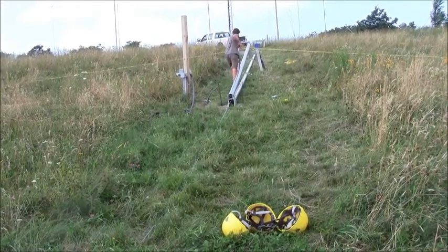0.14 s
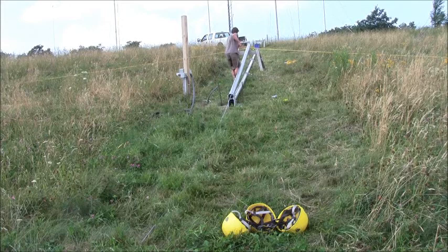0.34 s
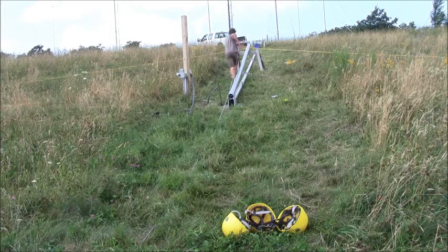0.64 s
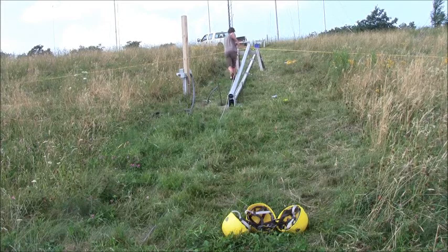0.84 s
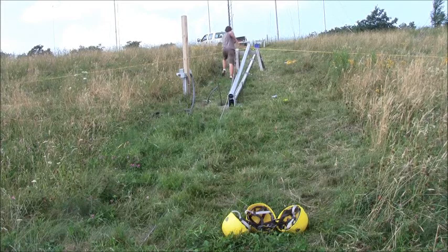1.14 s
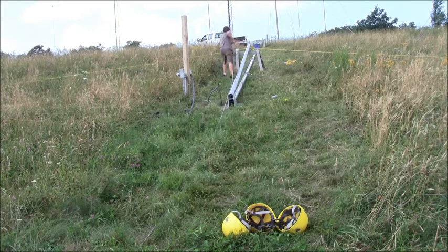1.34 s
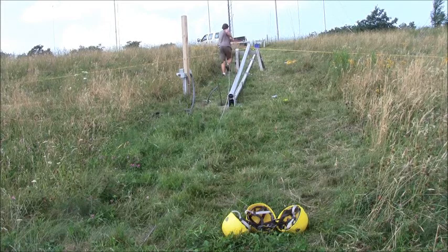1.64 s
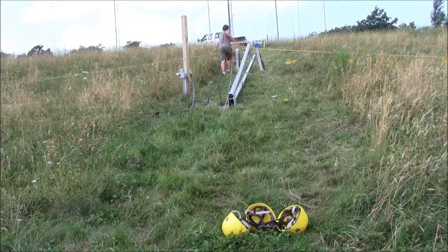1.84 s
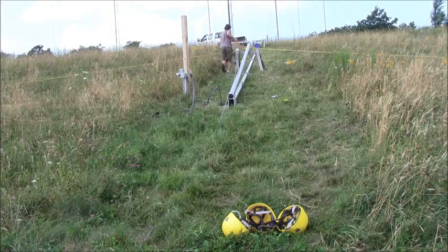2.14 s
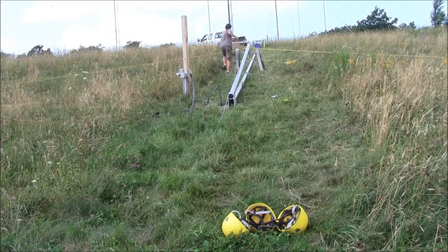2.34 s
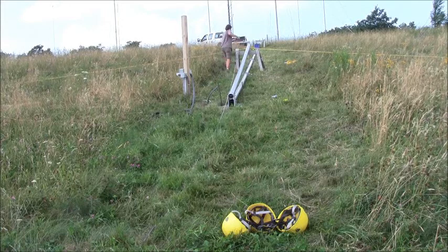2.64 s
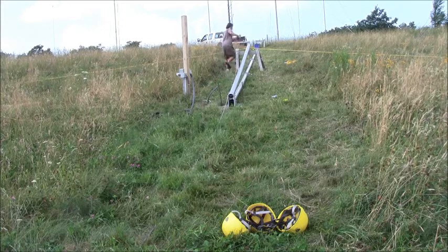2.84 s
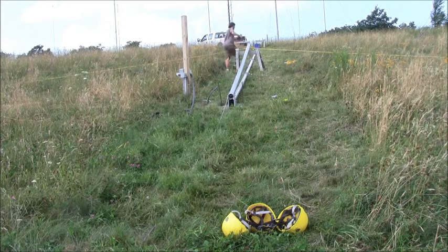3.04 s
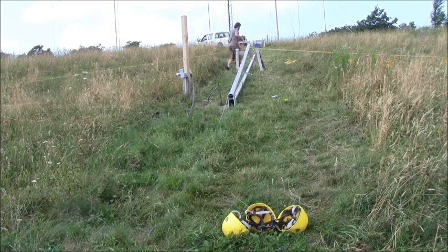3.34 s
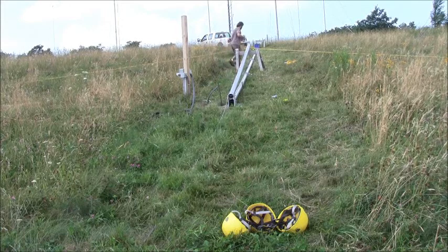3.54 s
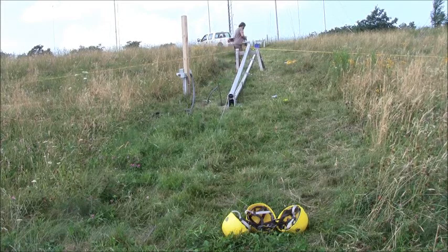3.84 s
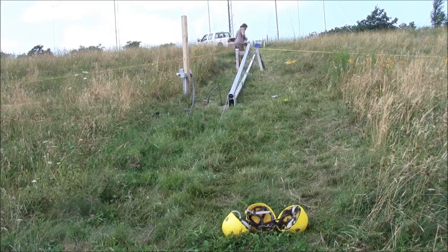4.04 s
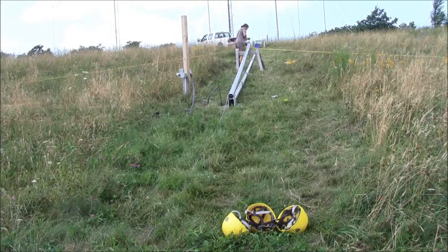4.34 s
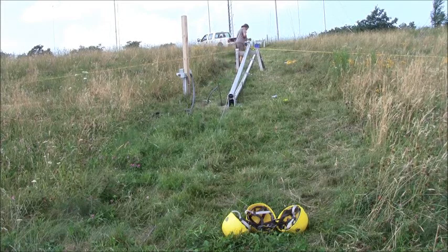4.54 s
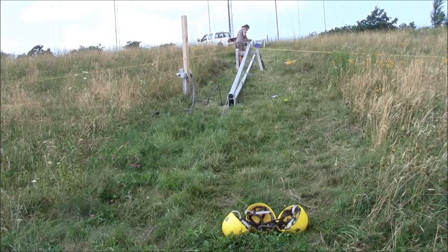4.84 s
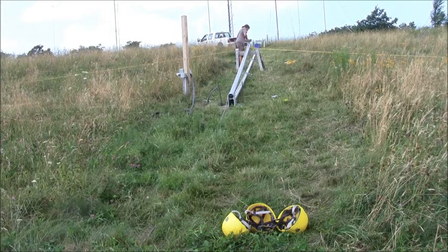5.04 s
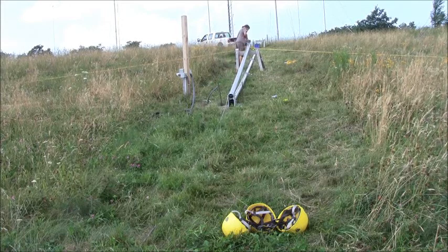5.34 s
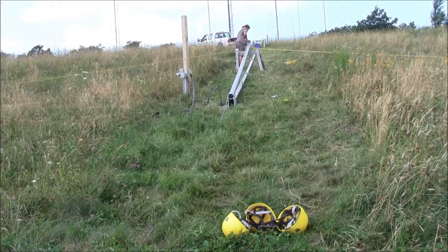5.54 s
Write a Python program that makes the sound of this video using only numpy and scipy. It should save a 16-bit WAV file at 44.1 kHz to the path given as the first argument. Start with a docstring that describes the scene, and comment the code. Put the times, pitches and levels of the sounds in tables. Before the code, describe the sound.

In a quiet meadow, a loose spinning winch drum clatters and hums steadily, stops, and a few steel clicks and scrapes follow.

```python
"""A winch drum runs freely straight ahead of the microphone while its cable is pulled off: random knocks
sound its frame and barrel modes, and rubbing makes flanges, barrel and frame hum and sing.
The pull ends after about three seconds; catches click and rub, loose fittings ping, and a steel part
slides home and rings in decaying modes. The place is a summer meadow: near grasshoppers rasp in pulsed
tones; distant ones, low wind and a few puffs at the microphone are coloured noise."""
import sys
import numpy as np
from scipy import signal
from scipy.fft import rfft, irfft, next_fast_len
from scipy.io import wavfile
from scipy.ndimage import map_coordinates

SR = 44100
rng = np.random.default_rng(int(sys.argv[2]) if len(sys.argv) > 2 else 0)


def pcm_store(signal):
    """Save signal as 16-bit PCM."""
    levels = np.round(np.clip(np.atleast_2d(signal), -1, 1) * 32767)
    wavfile.write(sys.argv[1], SR, levels.astype(np.int16).T)


N = 250929
T = np.arange(N) / SR  # time/s

# Levels in the tables are relative: filters and mixing gains follow.
# resonances of the winch frame: [f/Hz, width/Hz, level/dB]
FRAME_MODES = [(238, 6, -7), (383.7, 33, -1), (449, 67, -4.5), (534.4, 69, 0.5), (592.7, 57.7, 1)]
# resonances of the drum barrel: [f/Hz, width/Hz, level/dB]
BARREL_MODES = [(753.5, 45, -4), (876, 53, -2.5), (1031, 45.4, 4.5), (1124, 68, 1), (1229, 105, -7),
                (1365, 4.2, -0.5), (1477, 78, -9.5), (1769, 84, -7), (1917, 31, -6), (2023, 107, -8),
                (2175, 37, -3), (2266, 60, -8.5), (2503, 81, -10.5), (2675, 58, -9.5), (2846, 110, -12),
                (2972, 34, -17), (3100, 42, -12)]
# groups of barrel modes struck together: [low f/Hz, high f/Hz]
BARREL_ZONES = [(730, 1550), (1550, 2380), (2380, 3200)]
# how hard the pulled cable drives the drum, before the final fall: [t/s, level/dB]
PULL_DRIVE = [(0.0, -29.5), (0.06, -33), (0.76, -30.5), (0.86, -28.5), (1.08, -32), (1.12, -28.5),
              (1.15, -33), (3.32, -34), (3.44, -27), (3.72, -36.5), (3.98, -32.5), (4.06, -52)]
# the drum is nudged round a little: [t/s, level/dB, half length/s]
NUDGES = [(4.38, -49.5, 0.16), (4.96, -48, 0.15)]
# heavy rattles of the drum on its axle: [t/s, level/dB, length/s, tilt/(dB per octave) about 1400 Hz]
RATTLES = [(0.53, -23, 0.08, 2), (0.633, -19.5, 0.014, -2), (0.684, -20, 0.014, -6), (0.766, -24, 0.01, 11),
           (0.801, -19.5, 0.032, -8), (0.85, -21.5, 0.018, 8), (0.868, -13, 0.019, -1.5),
           (0.91, -19, 0.038, 0), (0.95, -22, 0.016, -7), (1.502, -20.5, 0.023, -3.5),
           (1.579, -18.5, 0.0086, -3), (1.634, -29, 0.021, -6), (2.058, -31, 0.013, -19),
           (2.125, -32, 0.012, -2), (2.5, -25, 0.019, 5), (2.658, -25.5, 0.045, -3), (2.754, -21, 0.027, 2),
           (2.96, -27.5, .05, -2.5), (3.433, -20.5, 0.033, 1.5), (3.62, -37, 0.0086, -17),
           (3.772, -42.5, 0.017, 21.5), (3.821, -50, 0.014, 21), (3.944, -47, 0.0083, 15),
           (4.045, -44, 0.0089, -7), (4.173, -47, 0.01, -11), (4.28, -41, 0.0072, -5),
           (4.4, -41.5, 0.012, -3), (5.236, -41.5, 0.07, -5), (5.662, -33.5, 0.01, 7.5)]
# colour of the drum's hiss: [f/Hz, level/dB]
HISS_COLOUR = [(1500, 0.5), (3000, 8.5), (4300, 4.5), (5300, 1), (6500, 4), (8000, 4), (10000, -5.5),
               (12000, -8), (15000, -21)]
# steady flange tones: [f/Hz, waver/Hz, level/dB]
FLANGE_TONES = [(4437, 20, -6.5), (5646, 18, -12.5)]
# the strongest flange tone comes and goes: [t/s, level/dB]
WHINE_LEVEL = [(0.0, -50), (0.04, -45.5), (0.23, -63), (0.27, -49), (0.31, -60), (0.4, -46.5), (0.59, -52),
               (0.62, -46), (0.71, -56), (0.92, -48), (0.97, -50.5), (1.11, -47), (1.29, -60),
               (1.34, -54.5), (2.29, -58), (2.37, -48), (2.49, -58), (2.54, -47.5), (2.68, -60),
               (2.74, -42), (2.77, -50), (3.11, -51), (3.25, -68), (3.4, -61), (3.43, -44), (3.63, -66),
               (3.81, -49), (3.9, -77)]
# other barrel modes that sing along: [f/Hz, width/Hz, level/dB]
BARREL_OVERTONES = [(1050, 130, -10.5), (1750, 50, -6), (2140, 19, -5)]
# the rubbing catches and the barrel sings out: [t/s, level/dB, half length/s]
SQUEALS = [(.12, -34, 0.053), (.34, -35, 0.045), (.6, -32.5, 0.12), (1.84, -40, 0.054), (2.4, -39, 0.11),
           (2.67, -34.5, 0.091), (2.95, -32, 0.044), (3.235, -32, 0.018), (3.27, -36, 0.21)]
# colour of the meadow's steady noise, with distant grasshoppers near 8.4 kHz: [f/Hz, level/dB]
MEADOW_COLOUR = [(88, -14), (150, 0.5), (257, -1.5), (393, 3), (991, -4), (1320, -3.5), (1600, -6.5),
                 (6430, -20.5), (8410, -4), (10000, -28.5), (15000, -29.5)]
# colour of the low wind: [f/Hz, level/dB]
BREEZE_COLOUR = [(15, -28), (28, -17), (48, -4.5), (70, -3.5), (110, -1.5), (170, -5.5), (250, -6),
                 (330, -66), (500, -70)]
# colour of a puff on the microphone: [f/Hz, level/dB]
PUFF_COLOUR = [(15, -16), (28, -16), (48, 2), (75, 2), (105, -7), (170, -7), (240, -29), (330, -38),
               (500, -70)]
# puffs of wind on the microphone: [t/s, level/dB, half length/s]
PUFFS = [(1.43, -48, 0.029), (3.225, -38.5, 0.054), (3.38, -50.5, 0.17), (3.7, -50, 0.025),
         (4.13, -58, 0.053), (5.58, -57, 0.05)]
# grasshoppers: [f/Hz, pitch scatter/Hz, fall in a stroke/Hz, stroke rate/(1/s), t of one stroke/s,
#                stroke swing either way/dB, level/dB]
GRASSHOPPERS = [(8830, 90, 600, 19.05, 4.677, 10, -2), (7800, 130, 1400, 18.3, 4.709, 10, -2.5),
                (8420, 180, 150, 18.3, 4.7, 2.5, .3)]
# hard knocks of the drum against its axle:
# [t/s, level in the frame/dB, level in low barrel modes/dB, level in high barrel modes/dB]
HARD_KNOCKS = [(0.343, -20.5, -27, -35), (0.407, -29, -32, -26), (0.764, -30, -32, -20),
               (0.773, -26, -30, -17), (0.845, -28, -18, -30), (0.862, -16.5, -23, -28),
               (0.873, -22, -28, -15), (0.883, -19, -21, -32), (0.944, -22.5, -19, -29),
               (0.948, -17.5, -24, -22), (0.962, -22, -19, -21), (0.994, -37, -33, -25),
               (1.052, -30, -31, -20), (1.097, -29, -20, -38), (1.161, -33, -23, -25.5),
               (1.456, -31, -22, -30), (1.95, -39, -32, -39), (2.579, -25, -27, -33),
               (1.627, -25, -22, -23), (1.633, -22, -21, -24), (1.979, -22, -24, -33),
               (2.186, -19, -29, -34), (3.082, -46, -29.5, -21.5), (3.088, -50, -36, -20),
               (3.093, -54, -45, -26), (3.435, -22.5, -32, -19), (3.764, -29.5, -36, -45),
               (3.818, -37, -42, -37), (3.935, -29.5, -47, -35.5), (3.968, -39, -57, -57),
               (4.828, -54, -40, -56)]
# loose fittings that ping once: [t/s, f/Hz, level/dB, t60/s]
PINGS = [(0.849, 5700, -36, .14), (3.233, 3750, -45, 0.04), (3.262, 4930, -41, .03),
         (3.282, 4710, -40, .035), (3.294, 4740, -37.5, 0.038), (3.321, 4900, -38, 0.026),
         (4.035, 6900, -48, 0.036), (4.27, 5940, -57, 0.043), (4.668, 1600, -44, 0.052)]
# steel contacts: [t/s, level/dB, brightness/dB]
CLICKS = [(3.082, -12, -39), (3.088, -18, -32), (3.093, -43, -29), (3.114, -39, -22), (3.145, -22, -16.5),
          (3.15, -42, -26), (3.235, -49, -19), (3.2844, -29, -19), (3.32, -23, -27), (3.424, -14, -49),
          (3.435, -18, -47), (3.442, -23, -40), (3.537, -29, -10.5), (3.547, -38, -26),
          (3.764, -38.5, -2.5), (3.78, -37, -7), (3.815, -41.5, -0.5), (3.932, -29.5, -9.5),
          (3.946, -46, -2), (4.27, -42, -23), (4.356, -37.5, -14), (4.483, -29, -16), (4.829, -42, -33),
          (4.9545, -29, -48), (5.028, -37, -34), (5.2195, -18, -18), (5.266, -21.5, -35), (5.446, -27, -42),
          (5.66, -21, -33)]
# short rubs of cable and steel: [t/s, length/s, level/dB, brightness/dB]
RUBS = [(1.766, 0.014, -44.5, 12), (3.267, 0.034, -59, -3), (3.407, 0.027, -39, -21),
        (3.712, 0.017, -42, 5), (3.807, 0.017, -54.5, 16), (4.421, 0.036, -43.5, -1),
        (4.476, 0.057, -35.5, 3), (5.2, 0.067, -37, 0.5), (5.424, 0.02, -43, -23), (5.629, 0.072, -44, -17)]
# colour of steel contacts: [f/Hz, level/dB]
STEEL_COLOUR = [(180, -39), (300, 12.5), (459, -28), (637, -0.5), (763, -6), (1250, -1), (1790, -3.5),
                (1970, -5.5), (3070, -7.5), (3670, -6), (6510, -14), (9180, -17.5), (10800, -23),
                (15000, -38)]
# resonances of the bracket that carries the catches: [f/Hz, width/Hz, level/dB]
BRACKET_MODES = [(1229.7, 15, 8), (1220.6, 11.6, 9), (1448, 23, 6.5), (1590, 5.2, -5), (1990, 11, 1)]
# modes of the sliding part: [f/Hz, level/dB, free t60/s]
SLIDER_MODES = [(1222, -5, 2), (1275, -6, 1.6), (1345, -9, 1.6), (1585, -16, 0.7), (2290, -13.5, 1.4),
                (3632, 2, 0.9), (3700, -3, 1.0)]
# blows on the sliding part: [t/s, level/dB, tilt/(dB per octave) above its first mode, share of free t60]
SLIDER_BLOWS = [(4.488, -57, 5, .5), (4.535, -43, -1, .75), (4.705, -54, .5, .75), (4.945, -55, -13, 1),
                (5.22, -53, -10, .2), (5.266, -45, -13, .2), (5.447, -50, -14, .12), (5.659, -51, -10, .12)]

STOP_S, STOP_DB_PER_S = 3.134, 14.5  # the pull ends and the drum comes to rest
CRUISE_DB = -32.5  # drive of a steady pull
IDLE_CLATTER_DB = -63  # floor: loose parts stir while the winch is handled
RATTLE_RISE = 0.95  # rise of a rattle as a share of its fading length
FLUTTER_DB, SWELL_DB = 2.8, 0.8  # fast and slow unsteadiness of the sung tones
WHINE_HZ, WHINE_WAVER_HZ = 6883, 12.3
BARREL_HZ, BARREL_HALF_WIDTH_HZ = 1337, 22  # half width at half amplitude
OVERTONE_DB = -8  # relative to the main barrel note
BARREL_GRIT_DB, BARREL_GRIT_RATE = 3.5, 260  # depth, and random knots a second
HUM_HZ, HUM_WAVER_HZ, HUM_DB = 236, 11.4, -61.5  # the frame's lowest mode
BREEZE_DB, BREEZE_SWING_DB, BREEZE_RATE = -57.5, 3.5, 7.3  # mean, swing, random knots a second
HOPPER_DB = -61.5  # shared by the chorus, before its balance and slow rise
PING_WAVER = 0.015  # loose contact blurs the pitch, as a share of it
CRACK_T60_S, TAIL_T60_S = 0.024, 0.096  # the two decays of a steel contact
RING_WAVER_HZ, RING_FLUTTER_DB = 11.2, 2.5  # the part sits loosely, so its ring wavers
TOP_HZ = 15200


def amp(db):
    """Decibels to gain."""
    return 10 ** (np.asarray(db) / 20)


def unit(x):
    """Scale to rms 1."""
    return x / np.sqrt(np.mean(x ** 2) + 1e-20)


def along(points, hz):
    """Read (f/Hz, value) points on a log frequency axis."""
    f, value = np.transpose(points)
    return np.interp(np.log(hz + 1), np.log(f + 1), value)


def over_time(rows):
    """Read (t/s, value) points at every sample."""
    return np.interp(T, *np.transpose(rows))


def wobble(rate):
    """A smooth random curve, rate knots a second."""
    knots = rng.standard_normal(int(N * rate / SR) + 4)
    return map_coordinates(knots, [T * rate])


def filtered(x, response):
    """Multiply the spectrum of x by a response of frequency."""
    m = next_fast_len(N + SR // 2)
    return irfft(rfft(x, m) * response(np.fft.rfftfreq(m, 1 / SR)), m)[..., :N]


def resonate(x, modes):
    """Pass x through parallel resonances of alternating sign."""
    def response(f):
        total = 0
        for k, (hz, width, db) in enumerate(modes):
            damping = 1j * f * width
            total = total + (-1) ** k * amp(db) * damping / (hz * hz - f * f + damping)
        return total
    return filtered(x, response)


def band(x, lo_hz, hi_hz, order=6):
    """Band-pass without phase shift."""
    def response(f):
        low_cut = 1 + (lo_hz / (f + 1)) ** (2 * order)
        high_cut = 1 + (f / hi_hz) ** (2 * order)
        return 1 / np.sqrt(low_cut * high_cut)
    return filtered(x, response)


def coloured(x, colour):
    """Give x the level over frequency of a colour table."""
    return filtered(x, lambda f: amp(along(colour, f)))


def noise(colour):
    """Coloured noise of rms 1."""
    return unit(coloured(rng.standard_normal(N), colour))


def spread(mid, side, side_db):
    """Left and right from a shared and an opposed part."""
    return mid + amp(side_db) * np.array([side, -side])


def knocks(rate, scatter_db):
    """Random small impacts of uneven size, on average rate a second, scaled to rms 1."""
    hits = rng.random(N) < rate / SR
    signs = rng.choice([-1, 1], N)
    return unit(hits * signs * amp(scatter_db * rng.standard_normal(N)))


def bell(age, length):
    """A smooth Gaussian swell with a tiny floor."""
    return np.exp(-np.minimum((age / length) ** 2, 20))


def swells(rows):
    """Gain of smooth (t/s, level/dB, half length/s) swells, added in power."""
    return np.sqrt(sum((amp(db) * bell(T - s, length)) ** 2 for s, db, length in rows))


def wavering_tone(hz, waver_hz, rate):
    """A sine whose pitch strays at random."""
    return np.sin(2 * np.pi * np.cumsum(hz + waver_hz * wobble(rate)[:len(hz)]) / SR)


def drive():
    """Level in dB of the drum's motion: the long pull, then the nudges."""
    pull = amp(over_time(PULL_DRIVE) - STOP_DB_PER_S * np.maximum(T - STOP_S, 0))
    return 20 * np.log10(np.hypot(pull, swells(NUDGES)))


def driven(steady_db, slope):
    """Level in dB of a sound that gains slope dB per dB of drive above a steady pull."""
    return steady_db + slope * (drive() - CRUISE_DB)


def rattle_force(hz):
    """Heavy rattles of the drum on its axle, as force near one frequency."""
    force = 0
    for s, db, length, tilt in RATTLES:
        age = T - s
        shape = bell(np.where(age < 0, age / RATTLE_RISE, age), length)
        force = force + amp(db + tilt * np.log2(hz / 1400)) * shape
    return force


def drum():
    """Dense random knocks of axle and cable make frame and barrel resound, under a hiss."""
    clatter_db = np.maximum(driven(-37.5, slope=1.36), IDLE_CLATTER_DB)
    shake = wobble(28.17)  # the loose drum shakes unevenly
    blows = knocks(rate=1700, scatter_db=2.0)

    def frame(x):
        return band(resonate(x, FRAME_MODES), 303, 706, order=8)

    rumble_force = np.hypot(amp(drive() + shake), 0.26 * rattle_force(1020))
    rumble = frame(blows * rumble_force) / np.std(frame(blows))
    barrel_gain = np.std(resonate(blows, BARREL_MODES))
    clatter = 0
    for lo, hi in BARREL_ZONES:  # the wandering contact favours now these modes, now those
        steady = amp(clatter_db + 0.11 * shake + 1.7 * wobble(40))
        force = np.hypot(steady, 0.33 * rattle_force(np.sqrt(lo * hi)))
        clatter += band(resonate(blows * force, BARREL_MODES), lo, hi, order=10) / barrel_gain
    hiss = unit(coloured(knocks(rate=4200, scatter_db=3.5), HISS_COLOUR))
    return rumble + clatter + hiss * amp(driven(-46, slope=0.86) + 1.8 * shake)


def sung_tone(hz, waver_hz):
    """A narrow tone of unsteady pitch and level, rms 1."""
    unsteady = amp(SWELL_DB * wobble(7.0) + FLUTTER_DB * wobble(75))
    return unit(unsteady * wavering_tone(np.full(N, hz), waver_hz, rate=160))


def singing():
    """Rubbing keeps flanges, barrel and frame in a narrow, fluttering ring until the drum slows."""
    flanges = sum(amp(db) * sung_tone(hz, waver) for hz, waver, db in FLANGE_TONES)
    flanges = flanges * amp(driven(-50.5, slope=0.85))
    flanges += sung_tone(WHINE_HZ, WHINE_WAVER_HZ) * amp(over_time(WHINE_LEVEL) + 0.5)
    flanges *= np.clip((4.0 - T) / 0.5, 0, 1)

    def barrel_peak(f):
        return 1 / (1 + ((f - BARREL_HZ) / BARREL_HALF_WIDTH_HZ) ** 2)

    rubbed = unit(filtered(rng.standard_normal(N), barrel_peak))
    overtones = unit(resonate(rng.standard_normal(N), BARREL_OVERTONES))
    grit = amp(BARREL_GRIT_DB * wobble(BARREL_GRIT_RATE))  # the contact sticks and slips
    barrel = unit(grit * (rubbed + amp(OVERTONE_DB) * overtones))
    barrel *= np.hypot(amp(driven(-46, slope=0.72)), swells(SQUEALS))
    hum = sung_tone(HUM_HZ, HUM_WAVER_HZ) * amp(HUM_DB) * np.clip((4.7 - T) / 0.44, 0, 1)
    return flanges + barrel + hum


def meadow():
    """The meadow's faint steady noise with distant grasshoppers, and low wind and puffs at the microphone."""
    steady = spread(noise(MEADOW_COLOUR), noise(MEADOW_COLOUR), side_db=-1.5) * amp(-53)
    strength = amp(BREEZE_DB + BREEZE_SWING_DB * wobble(BREEZE_RATE))
    wind = spread(noise(BREEZE_COLOUR), noise(BREEZE_COLOUR), side_db=-14) * strength
    puffs = spread(noise(PUFF_COLOUR), noise(PUFF_COLOUR), side_db=-11) * swells(PUFFS)
    return steady + wind + puffs


def grasshoppers():
    """Each insect rasps on a rough note that swells and falls in pitch with every leg stroke."""
    chorus = np.zeros((2, N))
    for hz, scatter, fall, rate, s, depth_db, db in GRASSHOPPERS:
        # place in the stroke, from -0.5 to 0.5, loudest at 0
        place = (rate * (T - s) + 0.063 * wobble(3.1) + .5) % 1 - .5
        strokes = unit(amp(depth_db * np.cos(2 * np.pi * place)))
        mid, side = [unit(wavering_tone(hz - fall * place, scatter, rate=700)) for _ in range(2)]
        chorus += amp(HOPPER_DB + db) * strokes * spread(mid, side, side_db=-9.0)
    balance = amp([[1.2], [-1.2]])  # a little to the left
    return chorus * balance * amp(np.interp(T, [2.5, 5], [-2.5, .5]))


def hard_knocks():
    """Each hard knock rings frame and barrel at once; where it lands decides which modes answer."""
    def struck(modes, column):
        blows = np.zeros(N)
        for row in HARD_KNOCKS:
            blows[round(row[0] * SR)] += amp(row[column])
        single_blow = resonate(1.0 * (T == 0), modes)
        return resonate(blows, modes) / np.abs(single_blow).max()

    split_hz = BARREL_ZONES[0][1]
    low = [mode for mode in BARREL_MODES if mode[0] < split_hz]
    high = [mode for mode in BARREL_MODES if mode[0] >= split_hz]
    return struck(FRAME_MODES, 1) + struck(low, 2) + struck(high, 3)


def pings():
    """Loose fittings chink briefly, each a decaying tone around one blurred note."""
    out = np.zeros(N)
    for s, hz, db, t60 in PINGS:
        age = T[:N - round(s * SR)]
        note = wavering_tone(np.full(len(age), hz), hz * PING_WAVER, rate=870)
        out[-len(age):] += amp(db - 60 * age / t60) * note
    return out


def steel(dull, bright):
    """The colour of steel contacts; hard ones add treble."""
    all_hz = np.linspace(0, SR / 2, 2048)
    gain = np.sqrt(np.mean(amp(along(STEEL_COLOUR, all_hz)) ** 2))
    contacts = band(dull, 810, 4070, order=2) + band(bright, 7040, 21000, order=3)
    return coloured(contacts, STEEL_COLOUR) / gain


def fittings():
    """Catches click and steel parts rub: gritty impacts that also excite their bracket."""
    dull, bright = np.zeros((2, N))
    for s, db, bright_db in CLICKS:
        age = np.maximum(T - s, 0)
        decay = amp(-60 * age / CRACK_T60_S) + 0.5 * amp(-60 * age / TAIL_T60_S)
        blow = (T >= s) * amp(db - 12.0) * decay
        dull += blow
        bright += blow * amp(bright_db + 25.0)
    for s, length, db, bright_db in RUBS:
        rise = np.clip((T - s) / 0.011, 0, 1)
        fade = amp(-60 * np.maximum(T - s - length, 0) / 0.26)
        stroke = amp(db) * rise * fade
        dull = np.hypot(dull, stroke * amp(-max(bright_db, 0) / 2))
        bright = np.hypot(bright, stroke * amp(bright_db))
    grit = knocks(rate=13000, scatter_db=4.5)
    contacts = steel(dull * grit, bright * grit)
    return contacts + resonate(contacts, BRACKET_MODES)


def ring():
    """The sliding part meets its stop and rings in decaying modes; the hand damps the last blows."""
    out = np.zeros(N)
    lowest_hz = SLIDER_MODES[0][0]
    for s, db, tilt, freedom in SLIDER_BLOWS:
        age = T[:N - round(s * SR)]
        for hz, level, t60 in SLIDER_MODES:
            flutter = RING_FLUTTER_DB * wobble(88.5)[:len(age)]
            mode_db = db + level + tilt * np.log2(hz / lowest_hz) + flutter
            note = wavering_tone(np.full(len(age), hz), RING_WAVER_HZ, rate=150)
            out[-len(age):] += amp(mode_db - 60 * age / (t60 * freedom)) * note
    return out


def scene():
    """The winch stands straight ahead; the slope scatters a little of its sound sideways."""
    winch = drum() + hard_knocks() + singing() + fittings() + pings() + ring()
    t = T[:SR // 8]
    tail = rng.standard_normal(len(t)) * amp(-60 * t / 0.087)
    scatter = signal.fftconvolve(winch, tail / np.linalg.norm(tail))[:N]
    # the scattered sound is brighter: (f/Hz, level/dB)
    side = coloured(scatter, [(400, -20.0), (2000, -15.5), (5000, -11.5), (9000, -8.5), (12000, -3.5)])
    return spread(winch, side, side_db=-2) * amp([[.2], [-.2]]) + grasshoppers() + meadow()


def record(dry):
    """The recorder behind the microphone keeps nothing above its band limit."""
    return filtered(dry, lambda f: f < TOP_HZ)


dry = scene()
out = record(dry)
pcm_store(out)
```